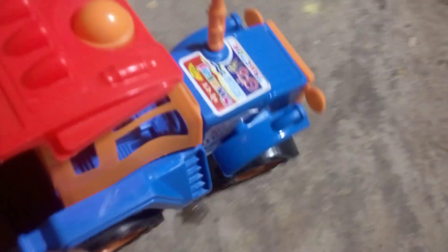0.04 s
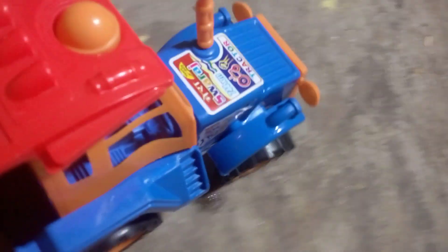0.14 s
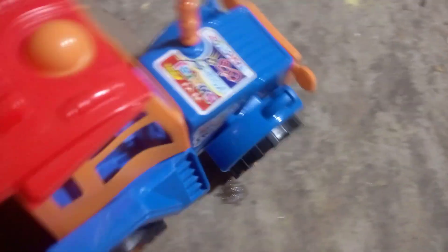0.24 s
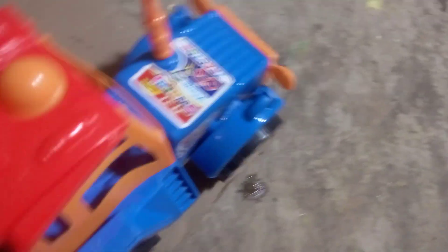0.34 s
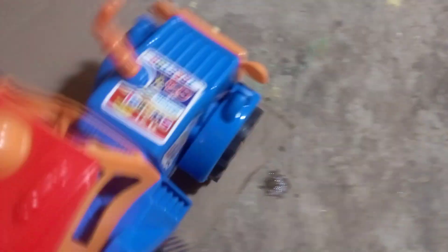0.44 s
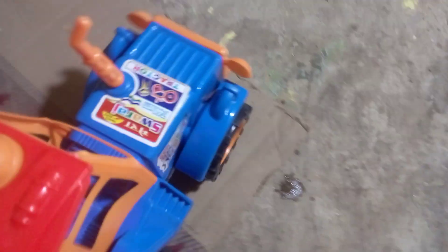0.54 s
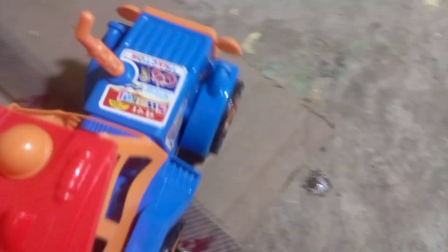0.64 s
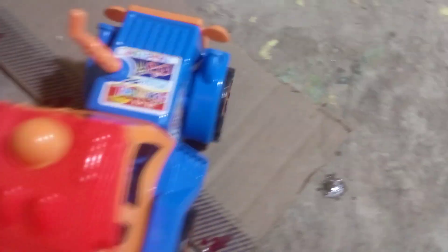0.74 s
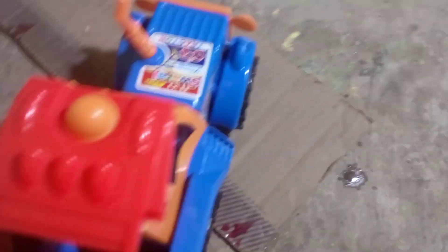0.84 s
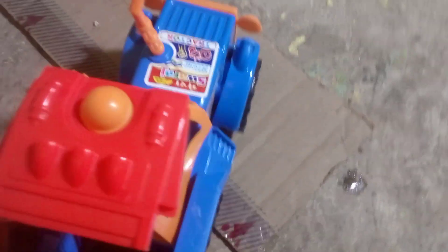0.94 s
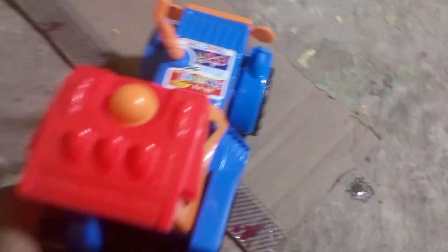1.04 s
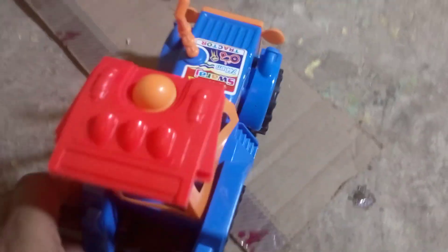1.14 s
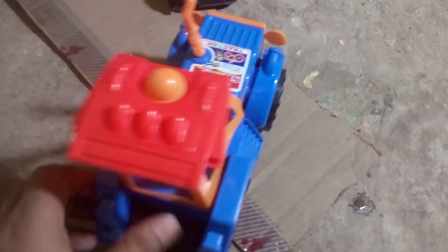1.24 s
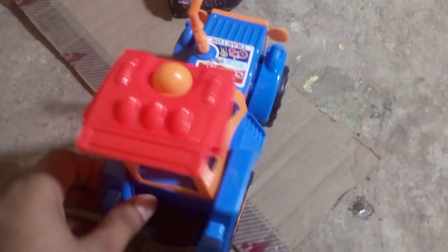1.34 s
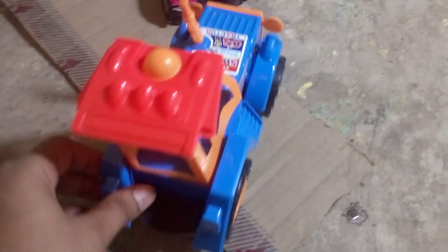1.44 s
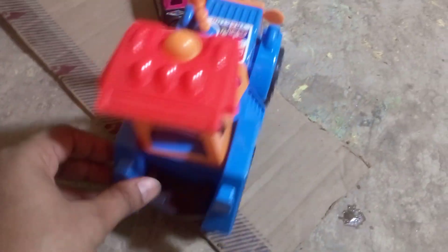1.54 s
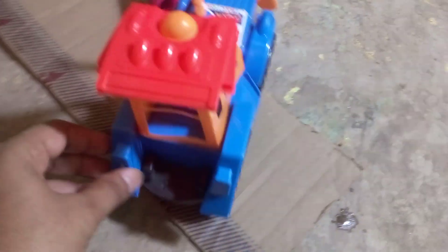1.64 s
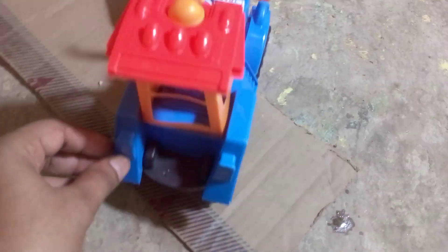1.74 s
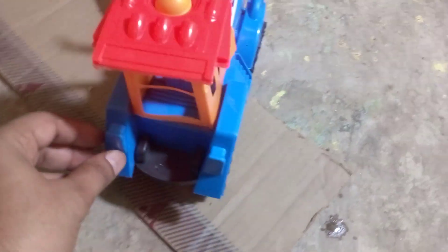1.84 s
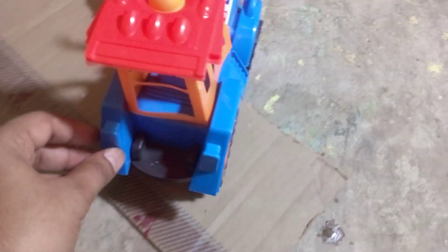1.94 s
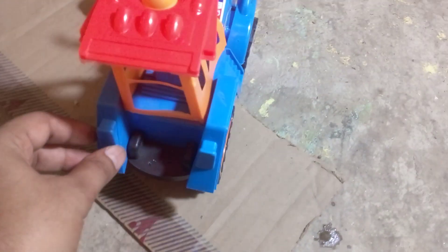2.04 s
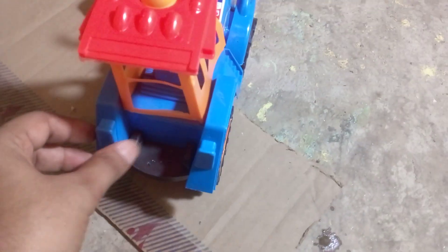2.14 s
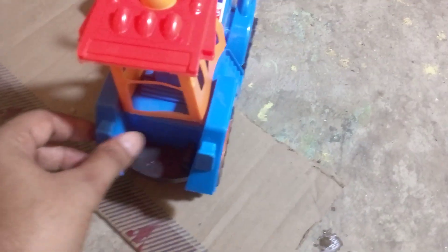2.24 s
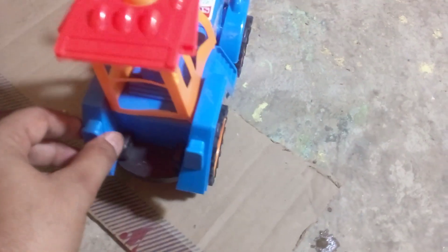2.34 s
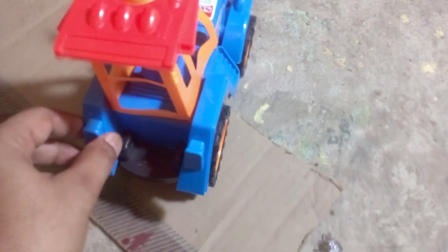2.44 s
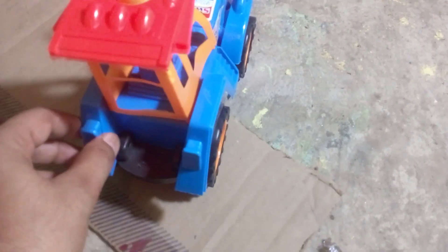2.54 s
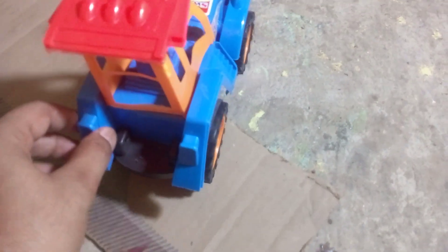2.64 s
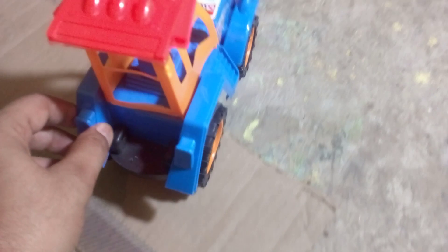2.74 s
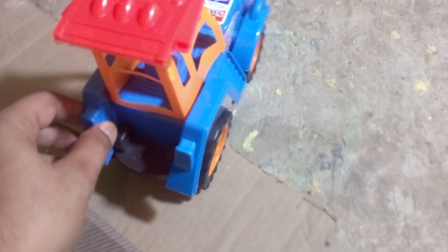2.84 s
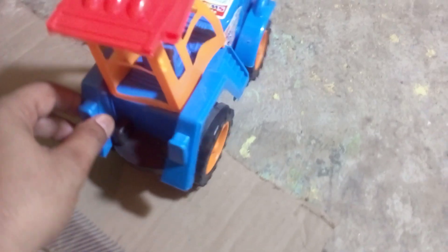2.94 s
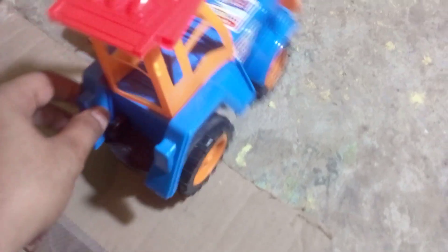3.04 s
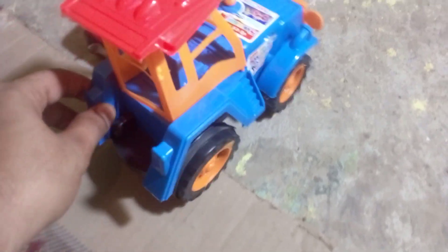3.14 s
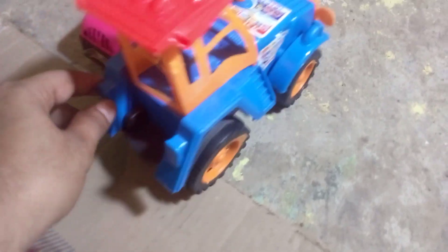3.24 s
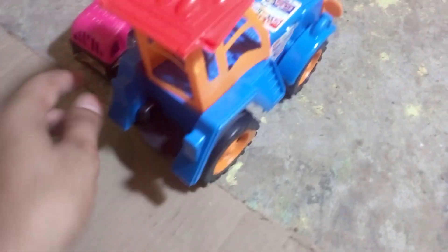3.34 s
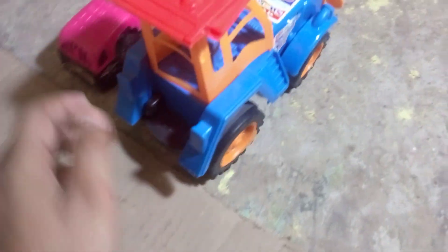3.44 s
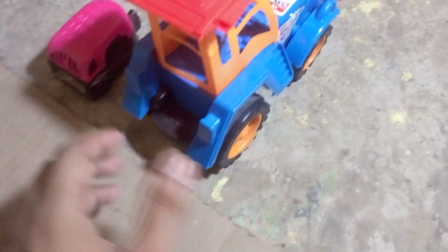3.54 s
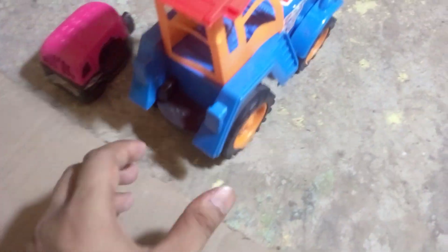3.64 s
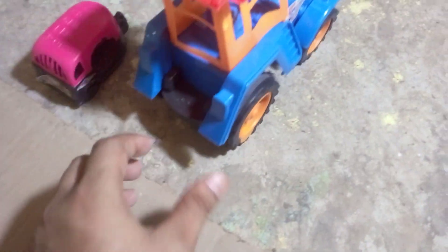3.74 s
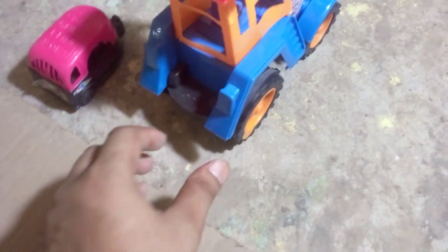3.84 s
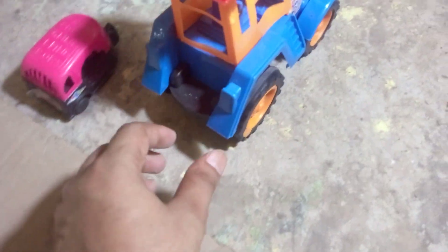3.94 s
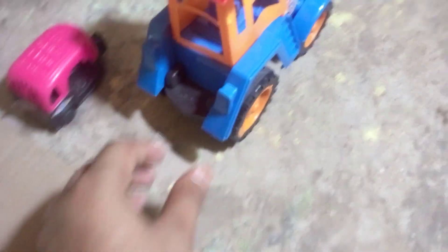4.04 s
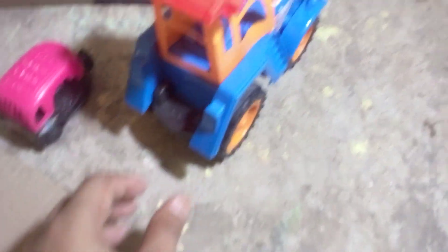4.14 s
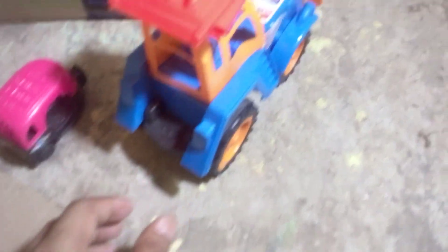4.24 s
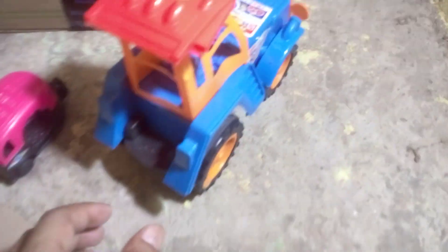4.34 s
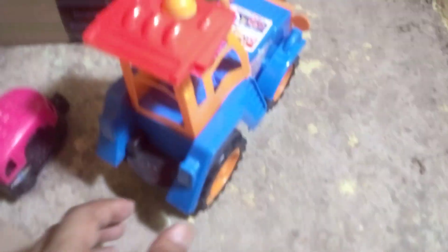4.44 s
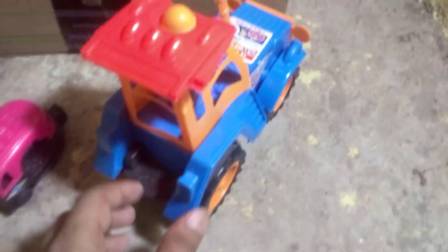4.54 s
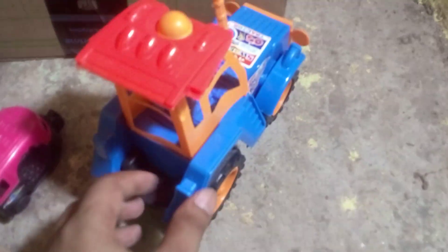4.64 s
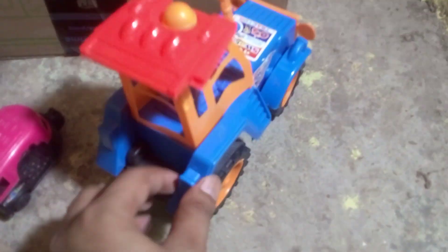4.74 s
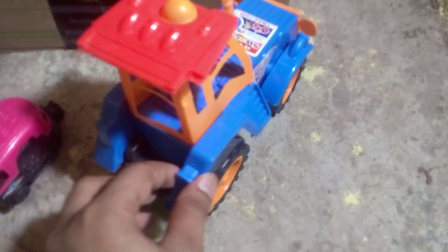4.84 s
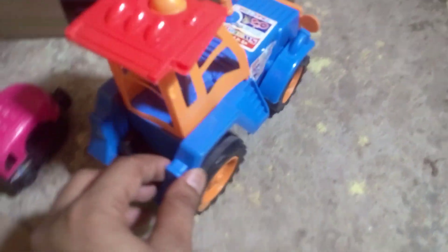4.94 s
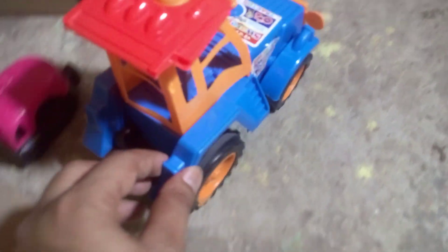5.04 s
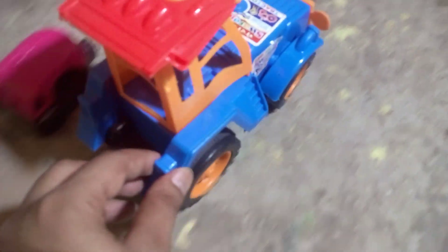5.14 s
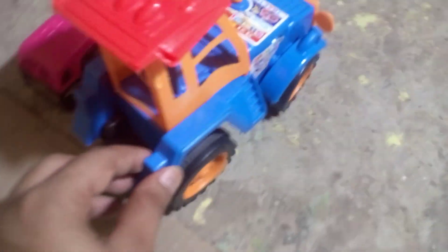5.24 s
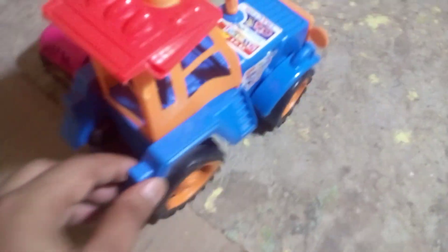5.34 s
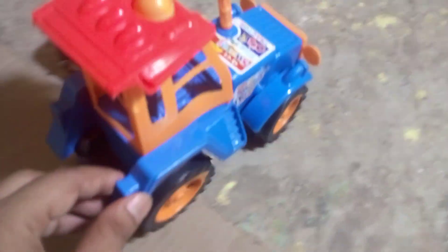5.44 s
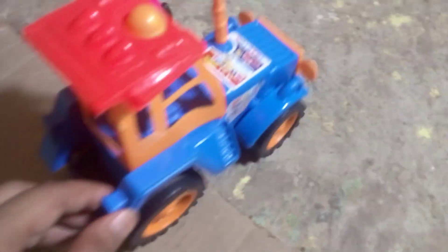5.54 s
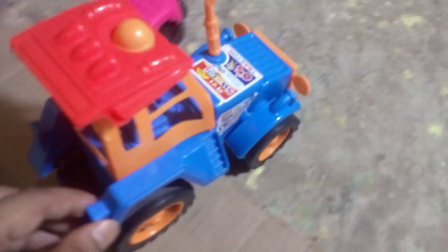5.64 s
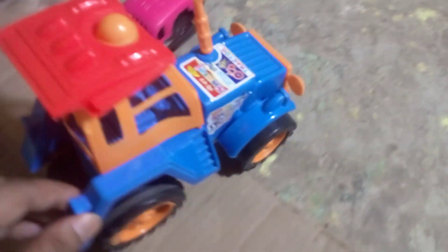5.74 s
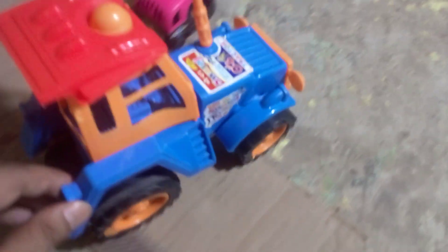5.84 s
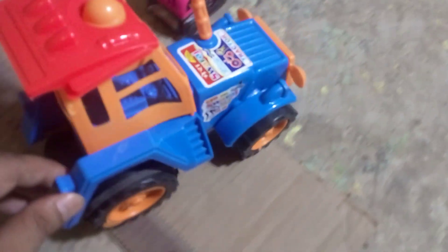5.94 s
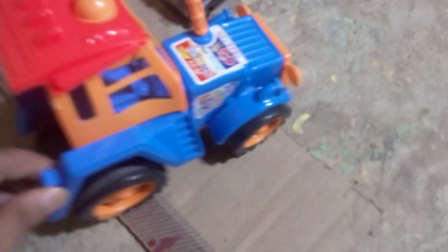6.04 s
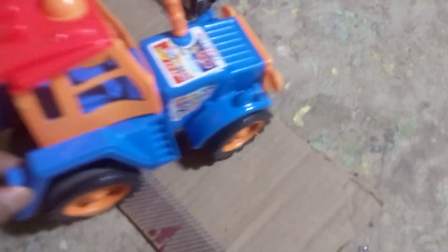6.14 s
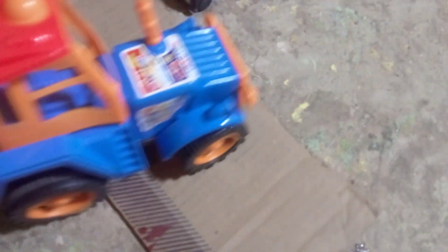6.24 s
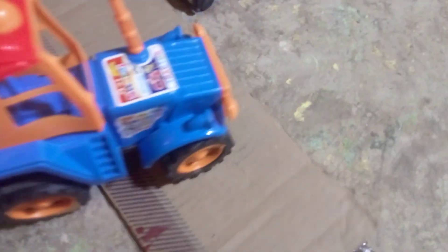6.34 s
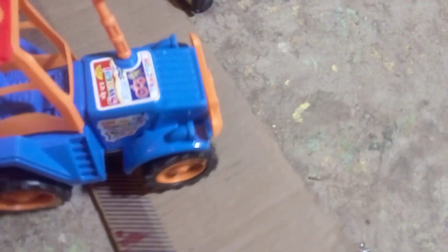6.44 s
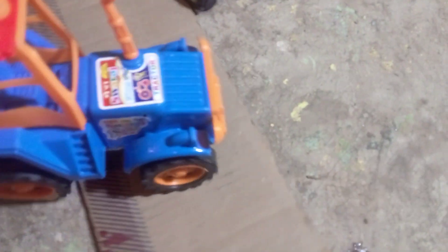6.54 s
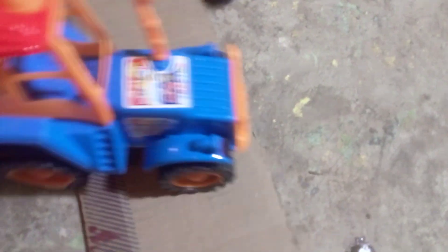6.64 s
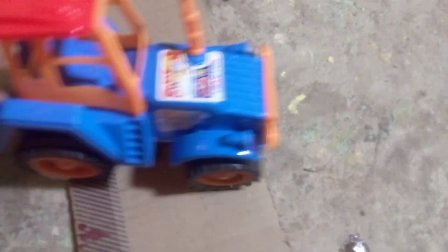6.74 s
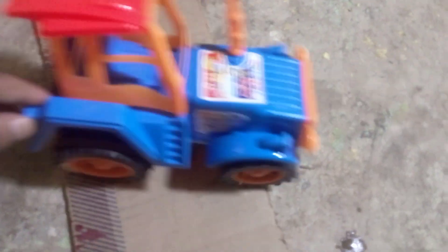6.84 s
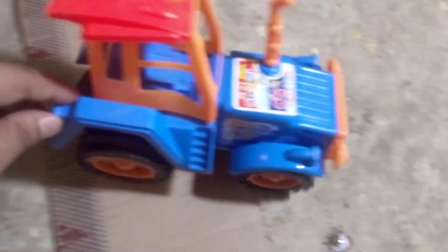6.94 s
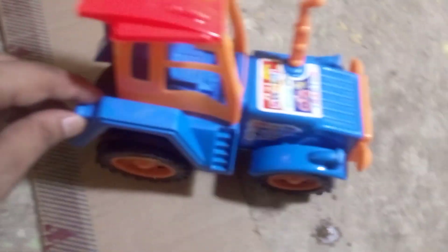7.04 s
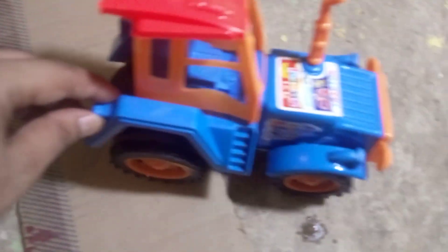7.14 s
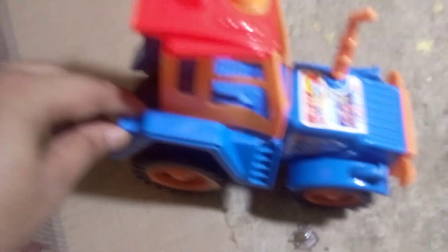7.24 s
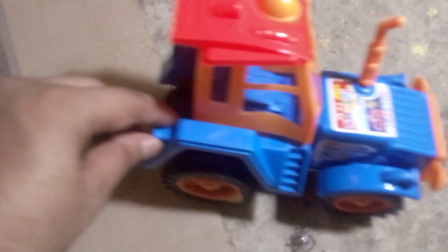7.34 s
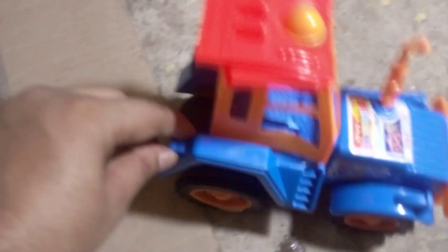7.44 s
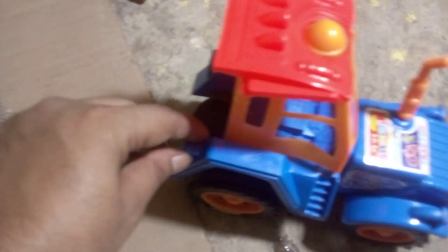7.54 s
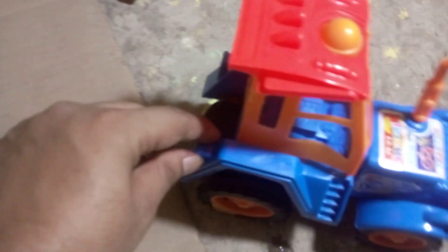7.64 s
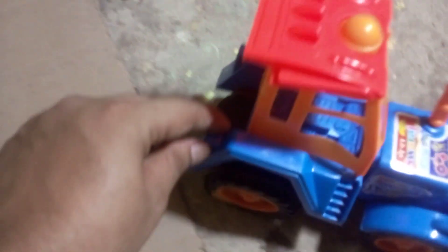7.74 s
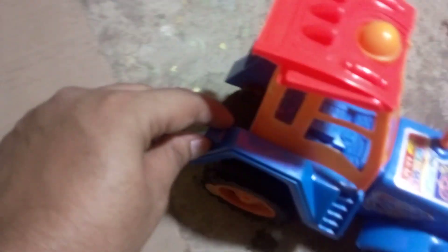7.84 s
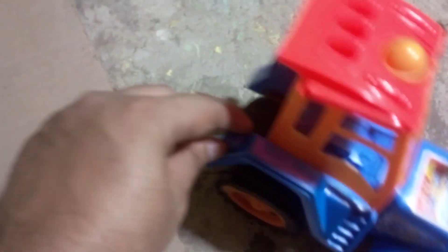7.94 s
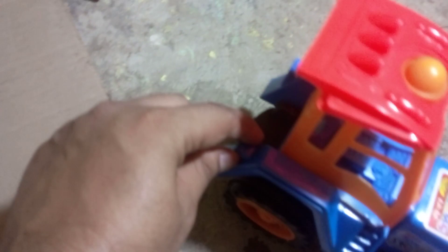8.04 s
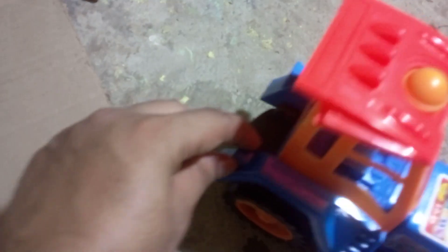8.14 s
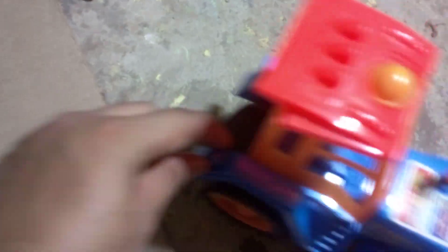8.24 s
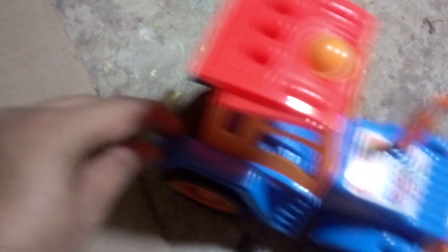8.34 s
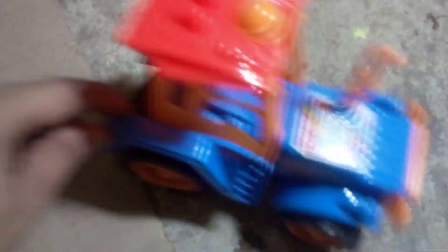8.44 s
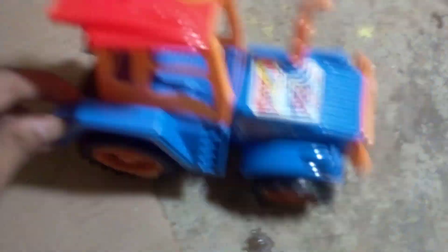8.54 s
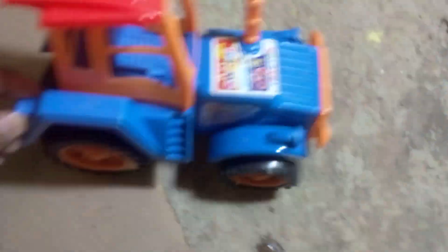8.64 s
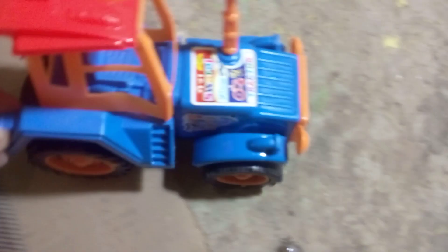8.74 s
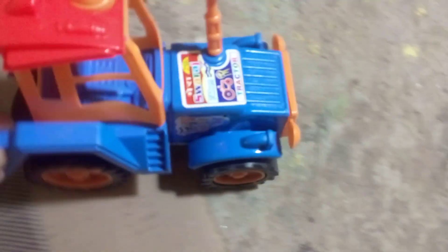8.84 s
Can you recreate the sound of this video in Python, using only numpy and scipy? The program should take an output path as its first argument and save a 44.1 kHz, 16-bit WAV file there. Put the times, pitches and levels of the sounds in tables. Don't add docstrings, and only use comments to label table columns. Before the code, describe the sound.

A hand pushes a hollow plastic toy tractor across gritty concrete and cardboard in a small room, heard very close. Wheels rattle unevenly, loose parts tick, grit snaps, and hard clacks ring the shell. Brief scrapes come near two seconds, a quieter pause follows around four and a half, then pushing resumes, ending in hard knocks. Engines idle and pull away dully behind the walls.

```python
import sys
import numpy as np
from scipy import signal
from scipy.fft import rfft, irfft
from scipy.io import wavfile
from scipy.ndimage import uniform_filter1d

SR = 44100
rng = np.random.default_rng(int(sys.argv[2]) if len(sys.argv) > 2 else 0)


def file_out(sig):
    cols = np.atleast_2d(sig).T
    lim = np.clip(cols, -1, 1)
    pcm = np.round(lim * 32767).astype(np.int16)
    wavfile.write(sys.argv[1], SR, pcm)


def elevation(decibels):
    levels = np.asarray(decibels, float)
    return 10 ** (levels / 20)


N = 391166


def level(x, db):
    return x * elevation(db) / np.sqrt(np.mean(x ** 2))


def along(s, values):
    return np.interp(np.arange(N) / SR, s, values)


def colour(x, points):
    hz, db = np.transpose(points)
    log_hz = np.log(np.maximum(np.fft.rfftfreq(len(x), 1 / SR), 1))
    gain_db = np.interp(log_hz, np.log(hz), db)
    return irfft(rfft(x) * elevation(gain_db), len(x))


def ring(x, hz, t60):
    radius = np.exp(-np.log(1000) / (t60 * SR))
    angle = 2 * np.pi * hz / SR
    return signal.lfilter([0, radius * np.sin(angle)], [1, -2 * radius * np.cos(angle), radius ** 2], x)


def walk(rate):
    hold = int(SR / rate)
    steps = rng.standard_normal(N // hold + 1)
    return uniform_filter1d(np.repeat(steps, hold), hold)[:N]


def swell(start_s, hold_s, rise_s, fall_s):
    t = np.arange(0, N, 64) / SR - start_s
    rise = np.minimum(t, 0) / rise_s
    fall = np.maximum(t - hold_s, 0) / fall_s
    return np.repeat(np.exp(rise - fall), 64)[:N]


def taps(count, spread_db):
    chance = rng.random((count, 2))
    size_db = np.minimum(-spread_db * np.log(chance[:, 1]), 2 * spread_db)
    return (chance[:, 0] * N).astype(int), elevation(size_db)


def struck(modes, at, size, scatter_db, near_hz=None, fall_db=0., wander_db=0.):
    out = np.zeros(N)
    for hz, db, t60 in modes:
        octaves_off = 0 if near_hz is None else np.abs(np.log2(hz / near_hz))
        gain_db = db - fall_db * octaves_off + scatter_db * rng.standard_normal(len(at))
        gain_db += wander_db * np.interp(at, np.linspace(0, N, 120), rng.standard_normal(120))
        sign = rng.choice([-1, 1], len(at))
        out += ring(np.bincount(at, size * elevation(gain_db) * sign, N), hz, t60)
    return out


def blip(at, hz, size, rise_s, decay_s):
    out, t = np.zeros(N), np.arange(SR // 40) / SR
    shape = np.exp(-t / decay_s) * (1 - np.exp(-t / rise_s))
    shape = shape / shape.max()
    for start, note_hz, gain in zip(at, hz, size):
        note = gain * np.sin(2 * np.pi * note_hz * t) * shape
        out[start:start + len(t)] += note[:N - start]
    return out


# (frequency [Hz], level [dB per Hz])
GRIT_SPECTRUM = [(3000, -11.5), (5000, 2.5), (7500, -14.5), (10300, -3.5), (12000, -9), (15300, -7),
                 (16000, -43)]


def crackle(at, size, decay_s):
    envelope = signal.lfilter([1], [1, -np.exp(-1 / (decay_s * SR))], np.bincount(at, size, N))
    return colour(envelope * rng.standard_normal(N), GRIT_SPECTRUM)


# (frequency [Hz], level [dB per Hz])
STREET_SPECTRUM = [(18, -37), (30, -17), (43, 5), (100, -5.5), (124, -3.5), (221, -15.5), (252, -13),
                   (400, -17), (1670, -26), (5450, -42.5), (6720, -56), (11100, -46.5), (16000, -53)]
# (time [s], level [dB])
WALL_LEVEL = [(0, -50), (2.2, -48.5), (3.5, -44), (4.7, -50), (6.8, -52), (8.3, -40.5)]


def street():
    rumble = level(colour(rng.standard_normal(N), STREET_SPECTRUM), -44)
    wall = level(ring(rng.standard_normal(N), 98.9, 0.65), 0)
    return rumble + wall * elevation(along(*np.transpose(WALL_LEVEL)))


def drone(table, multiple, column):
    rows = np.array(table)
    s = rows[:, 0]
    edge_s = rows[[0, 0, -1, -1], 0] + [-0.25, 0.061, -0.04, 0.097]
    edge = along(edge_s, [0, 1, 1, 0])
    phase = 2 * np.pi * np.cumsum(multiple * along(s, rows[:, 1])) / SR
    return np.sqrt(2) * edge * elevation(along(s, rows[:, column])) * np.sin(phase)


# (multiple of the idle rate [1], level re the third [dB])
IDLE_ORDERS = [(4, -14.5), (6, -9.5), (7, -21), (8, -14.5), (9, -14), (11, -19)]
# (time [s], level [dB])
IDLE_LEVEL = [(0.0, -35.5), (0.34, -44), (0.76, -43), (1.41, -48), (1.8, -51), (2.67, -45.5), (4.4, -53.5),
              (5.95, -41.5), (6.7, -51), (7.98, -48), (8.87, -48)]
# (time [s], frequency [Hz], level [dB], level at 1.5 times [dB], level at 2 times [dB])
PULL_AWAYS = [
    [(0.75, 59.75, -52, -70, -46.5), (1.212, 65.06, -38.5, -51, -56), (2.45, 65.3, -55, -64, -54),
     (2.6, 62.5, -51, -39, -58)],
    [(6.5, 61.8, -47, -47, -54), (7.98, 65.2, -34.5, -45, -56), (8.54, 66, -48, -39.5, -44),
     (8.87, 66.9, -52, -56, -61.5)],
]
# (time [s], frequency [Hz], level [dB])
PASSING_DRONES = [
    [(0.0, 75.6, -32), (0.55, 76.7, -35), (0.8, 75.4, -46), (2.2, 74, -42.5)],
    [(2.9, 74.6, -64), (3.166, 73, -48), (3.7, 77, -60)],
    [(5.55, 86, -63), (5.85, 82.5, -36.5), (6.1, 82.1, -56), (6.4, 80.5, -35), (6.6, 81.5, -56)],
    [(.1, 149, -43), (.6, 144, -46)],
]


def engines():
    idle_hz, waver_db = 17.87, 3
    phase = 2 * np.pi * idle_hz * np.arange(N) / SR
    idle = np.sin(3 * phase)
    for k, db in IDLE_ORDERS:
        idle = idle + elevation(db + waver_db * walk(3.0)) * np.sin(k * phase + k * k)
    out = np.sqrt(2) * idle * elevation(along(*np.transpose(IDLE_LEVEL)))
    for table in PULL_AWAYS:
        for multiple, column in [(1, 2), (1.5, 3), (2, 4)]:
            out += drone(table, multiple, column)
    return out + sum(drone(table, 0.98, column=2) for table in PASSING_DRONES)


# (frequency [Hz], level [dB], t60 [s])
FLOOR_MODES = [(126.4, -31, 0.3), (117, -27, 0.28), (233, -38, 0.093), (337, -30.5, 0.1),
               (520, -15.5, 0.014)]


def thump():
    push = np.bincount([int(4.829 * SR)], minlength=N) * 1.
    floor = sum(elevation(db) * ring(push, hz, t60) for hz, db, t60 in FLOOR_MODES)
    return uniform_filter1d(floor, SR // 1500)


# (frequency [Hz], level [dB per Hz])
DRAG_SPECTRUM = [(900, -32), (1300, -1), (2000, 6), (3000, 2.5), (4200, -25.5)]
# (start [s], hold [s], level [dB], centre [Hz])
WHEEL_DRAGS = [
    (0.718, 0.065, -33.5, 1940),
    (1.873, 0.037, -29, 1940),
    (1.994, 0.11, -35, 2060),
    (7.373, 0.069, -37.5, 620),
    (7.475, 0.1, -42.5, 500),
    (8.492, 0.046, -35, 563),
]


def drag():
    at, size = taps(count=25000, spread_db=1.0)
    slips = np.bincount(at, size * rng.choice([-1, 1], len(at)), N) * elevation(2.0 * walk(120))
    shape = np.array(DRAG_SPECTRUM)
    out = np.zeros(N)
    for start_s, hold_s, db, hz in WHEEL_DRAGS:
        scrape = colour(slips, shape * [hz / shape[2, 0], 1])
        out += level(scrape, db) * swell(start_s, hold_s, rise_s=0.016, fall_s=0.036)
    return out


# (time [s], peak level [dB], frequency [Hz])
GRAIN_SNAPS = [(0.137, -20.5, 15200), (0.207, -27.5, 9000), (0.318, -24, 14800), (0.4803, -21, 9900),
               (0.636, -18, 10700), (1.181, -24.5, 15200), (1.695, -23.5, 14600), (3.348, -26, 10200),
               (4.805, -31, 14900), (5.329, -23, 14900), (5.352, -17.5, 10200), (5.3782, -19.5, 13200),
               (6.391, -28, 14000), (7.794, -25.5, 11700), (8.645, -16, 15000), (8.8357, -19, 15300)]


def snaps():
    s, peak_db, hz = np.transpose(GRAIN_SNAPS)
    at = (s * SR).astype(int)
    notes = blip(at, hz, elevation(peak_db + 0.5), rise_s=0.00019, decay_s=0.00088)
    return notes + crackle(at, elevation(peak_db + 10.0), decay_s=0.0025)


def tapped(table, modes, note_db, ring_db, rise_s, decay_s, fall_db):
    s, peak_db, hz = np.transpose(table)
    at = (s * SR).astype(int)
    notes = blip(at, hz, elevation(peak_db), rise_s, decay_s)
    modal = struck(modes, at, elevation(peak_db), scatter_db=3.5, near_hz=hz, fall_db=fall_db)
    return elevation(note_db) * notes + elevation(ring_db) * modal


# (frequency [Hz], level [dB], t60 [s])
SHELL_MODES = [(1150, -11, 0.053), (1250, -10, 0.032), (1310, -10, 0.085), (1402, -2.5, 0.014),
               (1590, -7, 0.041), (1741, -6, 0.025), (1847, -3, 0.016), (2060, -5, 0.027),
               (2190, 0.5, 0.013), (2420, -3.5, 0.02), (2640, 6.5, 0.0077), (2940, 2, 0.013),
               (3180, 2, 0.013), (3550, 4.5, 0.01), (3925, 3, 0.012), (4263, 1.5, 0.012), (4800, -8, 0.022),
               (5380, -4, 0.012), (5870, -9.5, 0.016)]
PANELS = 6
# (frequency [Hz], level [dB], t60 [s])
CHASSIS_MODES = [(330, -13.5, 0.052), (428, -19, 0.053), (618, -7.5, 0.042), (669.7, -2.5, 0.074),
                 (740, -6, 0.084), (830.4, -1, 0.063), (918, 1.5, 0.037)]
# (frequency [Hz], level [dB], t60 [s])
LUG_MODES = [(7650, -1, 0.0065), (8400, -8, 0.003), (10200, 2, 0.0037), (11440, 7.5, 0.0044),
             (12800, 4.5, 0.0065), (13700, -4, .006), (15200, 8, 0.0069)]
# (time [s], peak level [dB], pitch [Hz])
BODY_TAPS = [(0.1233, -25, 724), (0.1354, -16, 1155), (0.3174, -19, 1155), (0.4219, -21, 1160),
             (0.4809, -6.5, 1210), (0.4998, -22, 1160), (0.5732, -15.5, 1290), (0.5954, -24, 1230),
             (0.7355, -22, 1373), (1.1845, -26, 1370), (1.5891, -22, 1300), (1.8812, -22, 1280),
             (2.0063, -31, 1280), (2.6654, -25, 1315), (2.7064, -23, 1364), (2.7777, -26, 1160),
             (3.0173, -32, 1220), (3.0495, -24, 1190), (3.1516, -24, 1140), (3.1668, -16, 1164),
             (3.364, -19, 1340), (3.5213, -23, 1175), (3.6522, -30, 1150), (3.638, -19, 1285),
             (3.8575, -14.5, 1213), (3.864, -14.5, 1310), (3.8856, -23, 1160), (4.0979, -36, 1290),
             (4.8348, -32, 1310), (5.3055, -26, 1200), (5.3722, -28, 1265), (5.8175, -21, 670),
             (5.8396, -11.5, 1230), (5.8554, -20, 660), (6.0084, -22, 1180), (6.6999, -28, 830),
             (6.7998, -21, 783), (6.831, -19, 1346), (6.8569, -17, 820), (6.886, -17.5, 820),
             (6.985, -22, 740), (7.0253, -21, 1280), (7.0698, -18, 1280), (7.1538, -17, 1270),
             (7.1757, -25, 885), (7.4255, -18, 1210), (8.7404, -20, 960), (8.8598, -16, 1210)]
# (time [s], peak level [dB], pitch [Hz])
LOOSE_PART_TAPS = [(0.0061, -16, 2290), (0.0629, -20, 3120), (0.3299, -11.5, 1620), (0.5622, -18, 1600),
                   (0.5953, -25, 2060), (0.7373, -24, 1920), (1.3393, -33, 1740), (1.5247, -21.5, 2600),
                   (1.7574, -29, 4050), (1.8822, -18.5, 1800), (1.996, -22.5, 1980), (2.1194, -26, 2620),
                   (2.5141, -14.5, 1660), (2.5321, -19, 1690), (2.8886, -29, 2040), (3.0273, -22, 3120),
                   (3.049, -23, 3470), (3.1931, -23, 1970), (3.2743, -25, 2540), (3.7163, -27, 1650),
                   (4.1436, -24, 1590), (4.9551, -26, 2060), (5.0378, -34, 2810), (5.1866, -28, 2810),
                   (5.603, -22, 2530), (5.6222, -19, 4400), (5.8165, -14.5, 2850), (5.8591, -20.5, 3780),
                   (5.9661, -25, 4400), (6.0084, -26, 2770), (6.3905, -19, 3470), (6.4031, -22, 1730),
                   (6.5466, -27, 1646), (6.5833, -29, 2430), (6.7516, -18.5, 1710), (6.9037, -18, 3260),
                   (6.9129, -23, 3310), (7.4321, -20.5, 1650), (7.9621, -27, 2180), (8.1715, -25, 2230),
                   (8.2146, -30, 2100), (8.3771, -29, 1610), (8.4243, -22.5, 2160), (8.4575, -16, 1760),
                   (8.5739, -16, 1690), (8.652, -6, 1560)]
# (time [s], peak level [dB], frequency [Hz])
GRIT_TICKS = [(0.2782, -31, 9850), (0.3672, -27, 12490), (0.595, -22.5, 10300), (1.7034, -28, 14790),
              (1.7104, -24.5, 10390), (1.757, -25, 12340), (1.842, -30, 14510), (1.953, -32, 12310),
              (2.7009, -34, 10700), (2.7263, -37, 14790), (2.965, -32, 10200), (2.9953, -32, 10090),
              (3.027, -30, 12300), (3.3533, -24, 10100), (3.428, -23, 15250), (3.6153, -32, 10580),
              (3.7168, -28, 14990), (3.8626, -27.5, 15000), (3.9392, -29, 10630), (4.839, -20.5, 10160),
              (4.86, -29, 10500), (4.947, -31, 9790), (5.1178, -32.5, 12210), (5.304, -22, 11140),
              (5.4578, -22.5, 15300), (5.5173, -33.5, 9640), (5.6127, -29, 10900), (5.7276, -28, 10290),
              (5.966, -30, 12580), (6.4683, -24.5, 8600), (6.582, -27.5, 10200), (6.7982, -29, 11050),
              (6.8295, -26, 14900), (7.11, -27, 10800), (7.317, -29, 14390), (7.385, -28, 15630),
              (7.4251, -28, 10990), (7.9223, -32, 10590), (7.9619, -26, 10660)]
# (time [s], peak level [dB], pitch [Hz])
FAINT_TOUCHES = [(1.0264, -27, 2220), (1.6454, -23, 3930), (2.106, -18.5, 2040), (2.2036, -30, 1680),
                 (2.4114, -31, 1740), (2.5634, -20, 2070), (2.663, -23, 1680), (3.1033, -30, 3080),
                 (4.894, -21, 2290), (5.0673, -27, 2300), (5.4221, -29, 3760), (5.5633, -21.5, 4400),
                 (6.2332, -25, 3440), (6.9816, -22, 3280), (7.2387, -21, 4480)]


def rattles():
    body_modes = CHASSIS_MODES[PANELS - 4:] + SHELL_MODES[:PANELS]
    part_modes = SHELL_MODES[PANELS - 2:]
    hollow = tapped(BODY_TAPS, body_modes, -3.2, -5.5, rise_s=0.0019, decay_s=0.0048, fall_db=35.0)
    parts = tapped(LOOSE_PART_TAPS, part_modes, -1.5, -8.0, rise_s=0.0006, decay_s=0.003, fall_db=13.0)
    ticks = tapped(GRIT_TICKS, LUG_MODES, -1.4, -10.5, rise_s=0.0002, decay_s=0.0014, fall_db=12.0)
    touches = tapped(FAINT_TOUCHES, part_modes + LUG_MODES, -7.0, -14.5,
                     rise_s=0.0004, decay_s=0.0021, fall_db=7.5)
    s, peak_db, _ = np.transpose(GRIT_TICKS)
    dust = crackle((s * SR).astype(int), elevation(peak_db + 6.0), decay_s=0.003)
    return hollow + parts + ticks + touches + dust


# (time [s], peak level [dB], pitch of the struck part [Hz], chatter [dB])
GRITTY_KNOCKS = [(.48, 0, 1240, -27), (0.6339, -7.5, 1360, -30), (0.6787, -16, 1320, -19),
                 (1.3387, -13, 1256, -17), (1.5237, -12.5, 1290, -13.5), (1.832, -11.5, 1280, -21),
                 (2.676, -16.5, 1250, -12.5), (3.2339, -11, 1216, -17), (3.4184, -14.5, 1310, -8.5),
                 (3.5083, -18, 1190, -5.5), (4.0797, -20, 1310, -9), (4.099, -20.5, 1310, -27),
                 (4.2072, -24.5, 1680, -21), (4.362, -34, 2350, -16), (4.7836, -22.5, 2320, -17),
                 (5.187, -20, 1310, -9), (5.271, -19, 3770, -10), (5.3523, -5.5, 1310, -37),
                 (5.452, -15, 1310, -15.5), (5.5856, -11, 1200, -7), (5.816, -6.5, 1280, -10.5),
                 (5.9498, -20, 4300, -7.5), (6.4676, -23, 2510, -39), (6.563, -16, 2420, -45),
                 (7.4147, -13.5, 1156, -17), (7.759, -13.5, 1730, -18), (7.9345, -10, 1970, -15),
                 (8.6438, -3, 1590, -20), (8.6663, -3.5, 1590, -38), (8.8256, 0, 1250, -17.5)]
# (time [s], peak level [dB], pitch [Hz], chatter [dB])
PLASTIC_SLAPS = [(0.3172, -5.5, 1250, -20), (0.87, -23.5, 1940, -39), (0.891, -24.5, 2940, -37),
                 (2.121, -25, 2530, -38), (2.5126, -18.5, 1800, -24), (2.54, -20.5, 1290, -27),
                 (2.705, -23, 1330, -18), (2.7268, -13.5, 1250, -14.5), (2.9871, -7.5, 1250, -19),
                 (3.0159, -16, 1280, -20), (3.059, -12.5, 1240, -29), (3.268, -11.5, 1200, -8),
                 (3.3483, -8.5, 1246, -17), (3.606, -12.5, 1300, -10.5), (3.623, -14, 1310, -12.5),
                 (3.8572, -10.5, 1250, -17), (4.142, -20.5, 1310, -9), (5.33, -8, 1280, -15),
                 (5.3447, -7.5, 1290, -34), (5.6133, -6.5, 1126, -30), (6.75, -15.5, 4130, -33),
                 (4.289, -38, 3450, -8), (7.7912, -5.5, 2170, -21.5), (7.9608, -18, 2120, -35),
                 (.999, -28, 2940, -7.5), (8.3147, -24.5, 2100, -35), (8.3634, -23, 2400, -12),
                 (8.6065, -5.5, 1360, -45)]
# (time [s], peak level [dB], pitch [Hz], chatter [dB])
WHEEL_DROPS = [(0.1351, -7.5, 2110, -37), (1.1354, -13.5, 1306, -17.5), (1.185, -20, 2250, -10),
               (1.6888, -10, 1364, -17), (1.7564, -18.5, 1310, -12.5), (1.454, -26, 2540, -35),
               (3.71, -22, 1590, -2), (4.1664, -24, 1310, -39), (4.805, -17.5, 1310, -19),
               (4.8194, -24, 1310, -0.5), (4.8594, -20.5, 1310, -12), (4.9428, -19.5, 2970, -31),
               (5.8398, -10, 715, -31), (5.9847, -16, 2550, -9), (6.3903, -7.5, 702, -19.5),
               (6.5251, -18, 1310, -15), (6.5474, -21, 1310, -28), (6.6683, -20.5, 1710, -7),
               (7.0625, -18, 1260, -6.5), (7.1161, -5, 920, -30), (7.1541, -21, 1180, -10),
               (7.3048, -20, 3600, -34), (7.6121, -11, 1340, -21), (8.1075, -24.5, 3520, -7),
               (8.1342, -19, 2300, -14.5)]
# (chassis share [dB], crack share [dB], first touch [dB])
KNOCK_KINDS = [
    (-18.5, -14.5, -1),
    (-22.5, -23, -9),
    (-11, -14.5, 3),
]


def blows():
    tables = [GRITTY_KNOCKS, PLASTIC_SLAPS, WHEEL_DROPS]
    return np.transpose([row + kind for rows, kind in zip(tables, KNOCK_KINDS) for row in rows])


def knocks():
    s, peak_db, hz, _, chassis_db, crack_db, touch_db = blows()
    crack_db = crack_db - 0.17 * (peak_db + 20.5)
    lag_s = np.array([-0.0098, -0.002, 0, 0.002, 0.006, 0.019]) * rng.uniform(0.6, 1.4, (len(s), 6))
    at = np.minimum(((s[:, None] + lag_s) * SR).astype(int), N - 1)
    size = elevation(peak_db[:, None] + np.array([-13, -10.0, 0, -1.5, -6.5, -12.5]))
    size[:, 0] *= elevation(touch_db)
    chassis_size = (size * elevation(chassis_db)[:, None]).ravel()
    crack_size = (size * elevation(crack_db)[:, None]).ravel()
    near_hz = np.repeat(hz, lag_s.shape[1])
    landing, at = at[:, 2], at.ravel()
    out = elevation(-10.0) * struck(SHELL_MODES, at, size.ravel(), scatter_db=1.5, near_hz=near_hz, fall_db=6.5)
    out += elevation(-7.5) * struck(CHASSIS_MODES, at, chassis_size, scatter_db=2.0)
    out += elevation(6.5) * crackle(at, crack_size, decay_s=0.0016)
    out += elevation(-10.5) * blip(landing, hz, elevation(peak_db), rise_s=0.0014, decay_s=0.0044)
    return signal.sosfilt(signal.butter(2, 620, "highpass", fs=SR, output="sos"), out)


def chatter():
    lag_s, decay_s = 0.011, 0.029
    s, peak_db, _, chatter_db, *_ = blows()
    kick = np.bincount(((s + lag_s) * SR).astype(int), elevation(peak_db + chatter_db), N)
    pole = np.exp(-1 / (decay_s * SR))
    return uniform_filter1d(signal.lfilter([1], [1, -pole], kick), SR // 200)


# (start [s], hold [s], level [dB], sharpness [dB])
HAND_SURGES = [(0, 0.0079, -28.5, 3), (0.35, 0.12, -34.5, 4), (0.497, 0.072, -28, -2.5),
               (0.607, 0.19, -36.5, 0.5), (1.403, .05, -39.5, -7), (1.688, 0.066, -44, 0.5),
               (1.875, 0.11, -31.5, -8), (2.188, 0.048, -39.5, -5.5), (2.544, 0.02, -29.5, -13),
               (2.835, 0.29, -44.5, -14), (3.142, 0.056, -28, -2.5), (3.378, 0.074, -32.5, -1),
               (3.49, 0.045, -43.5, 4.5), (3.657, 0.051, -34, -3), (3.94, 0.024, -36, -2),
               (4.95, 0.058, -48, -10), (5.165, .05, -56, 7), (5.276, 0.15, -39, 3.5),
               (5.498, 0.04, -41, -2), (5.628, 0.12, -33, -3.5), (5.78, 0.13, -38.5, -5),
               (6.076, 0.53, -53, 3.5), (7.994, 0.18, -58.5, 8), (6.725, 0.12, -34.5, -0.5),
               (6.847, 0.053, -25.5, -1), (6.956, 0.38, -32.5, -2.5), (7.426, 0.22, -38.5, -16),
               (7.593, 0.022, -37.5, 4), (8.455, 0.13, -24.5, -2), (8.607, 0.12, -31.5, 2)]
# (time [s], creep [dB], weight [dB])
HAND_CREEP = [(0, -29.5, -8), (.96, -45, -7), (1.12, -54, -5), (2.05, -38, -6.5), (2.3, -63, -12),
              (2.75, -44.5, -9), (3.2, -42.5, -4), (3.6, -77, -11), (4.1, -47, -8.5), (4.6, -73, -11),
              (5.1, -43.5, -8.5), (5.9, -48, -5.5), (6.6, -44.5, -5.5), (7.3, -42, -5), (7.7, -39, -2.5),
              (8.24, -52.5, 3), (8.45, -61, -5), (8.87, -26.5, -12.5)]
SURGE_RESPONSE = [-5.5, -2.5, -4.5, -9]
SHARPNESS_RESPONSE = [0.065, 1.44, 0.13, 1.84]
CREEP_RESPONSE = [-2, -3, 0.5, -11]


def effort():
    s, creep_db, weight_db = np.transpose(HAND_CREEP)
    gain = elevation(along(s, creep_db) + np.array(CREEP_RESPONSE)[:, None])
    for start_s, hold_s, db, sharp_db in HAND_SURGES:
        size = elevation(db + np.array(SURGE_RESPONSE) + sharp_db * np.array(SHARPNESS_RESPONSE))
        gain += size[:, None] * swell(start_s, hold_s, rise_s=0.044, fall_s=0.019)
    gain[2] *= elevation(along(s, weight_db))
    return gain


def steady(x, share):
    load = uniform_filter1d(x ** 2, SR // 16)
    return x / (load / load.mean() + 0.011) ** (share / 2)


def rolling():
    at, size = taps(count=10000, spread_db=3.5)
    clusters = walk(140)[at]
    hits = size * elevation(1.8 * clusters)
    panels = struck(SHELL_MODES[:PANELS], at, hits, scatter_db=4.5, near_hz=1280, fall_db=10, wander_db=1.5)
    parts = struck(SHELL_MODES[PANELS:], at, hits, scatter_db=5.0, wander_db=3.5)
    chassis = struck(CHASSIS_MODES, at, hits, scatter_db=6.5, wander_db=2.0)
    grains = size * elevation(1.6 * clusters + 3.2 * walk(150)[at])
    lugs = level(struck(LUG_MODES, at, grains, scatter_db=4.5, wander_db=4.0), -6.0)
    breaking = grains * elevation(5.0 * rng.standard_normal(len(at)))
    dust = level(crackle(at, breaking, decay_s=0.0039), -1.2)
    layers = [steady(panels, 0.13), steady(parts, 0.14), steady(chassis, 0.077), steady(lugs + dust, 0.13)]
    shake = chatter()
    shake_db = [-8.5, -6.0, -16.5, -17.5]
    return sum(level(x, 0) * (gain + elevation(db) * shake) for x, gain, db in zip(layers, effort(), shake_db))


def cab(x):
    hz, t60_s = 1280, 0.045
    gain = 2 * np.log(1000) / (t60_s * SR)
    return x + elevation(-7.5) * gain * ring(x, hz, t60_s)


def room(x):
    t = np.arange(SR // 2) / SR
    air = rng.standard_normal(len(t))
    dull = signal.lfilter([0.3], [1, -0.7], air)
    low_tail = dull * np.exp(-np.log(1000) * t / 0.6)
    high_tail = 0.59 * (air - dull) * np.exp(-np.log(1000) * t / 0.1)
    tail = low_tail + high_tail
    tail = (t > 0.003) * tail / np.sqrt(np.sum(tail ** 2))
    return signal.fftconvolve(x, tail)[:N]


def scene():
    toy = cab(rolling() + knocks() + snaps() + drag() + thump() + rattles())
    return (toy + elevation(-13.5) * room(toy) + engines() + street())[None]


def top_cut(x):
    return signal.sosfilt(signal.butter(12, 17110, fs=SR, output="sos"), x)


def record(dry):
    low = signal.ellip(4, 0.5, 16, 50, "highpass", fs=SR, output="sos")
    top = signal.ellip(8, 0.3, 45, 15800, fs=SR, output="sos")
    rounded = np.tanh(0.68 * dry) / 0.72
    mix = signal.sosfilt(np.vstack([low, top]), rounded)
    return top_cut(mix)


dry = scene()
out = record(dry)
file_out(out)
```